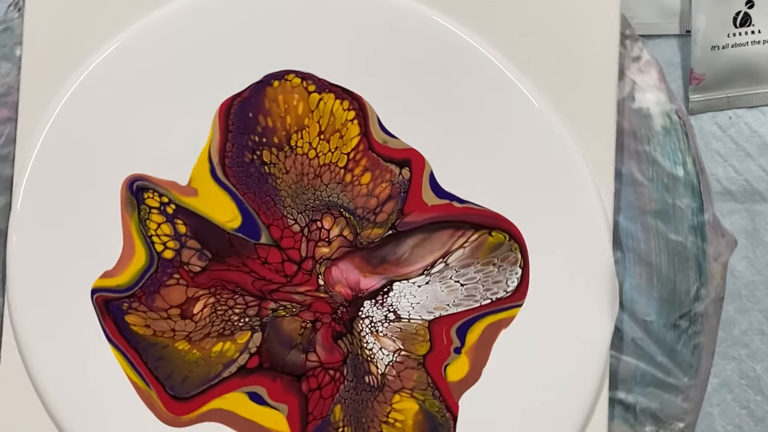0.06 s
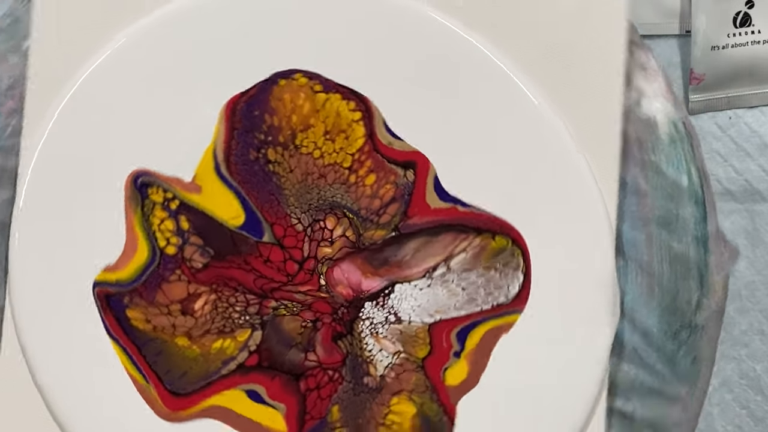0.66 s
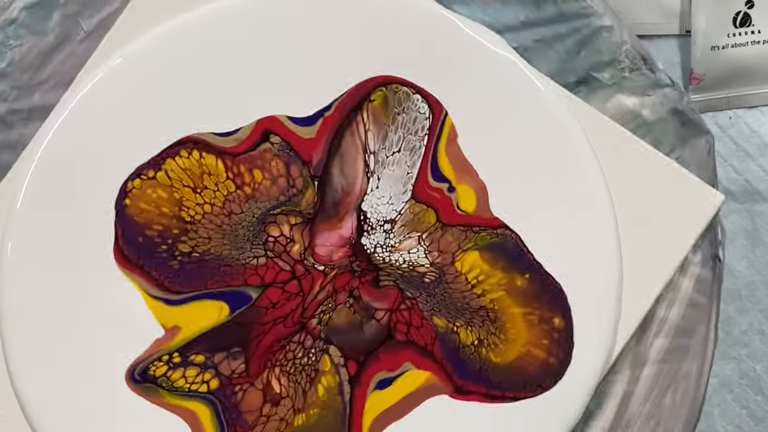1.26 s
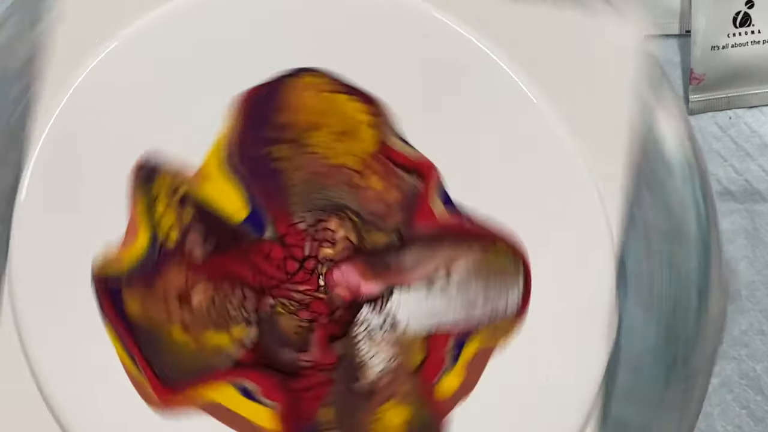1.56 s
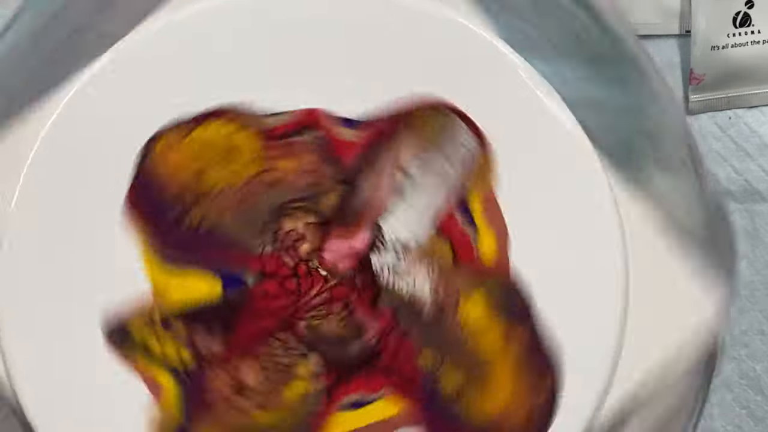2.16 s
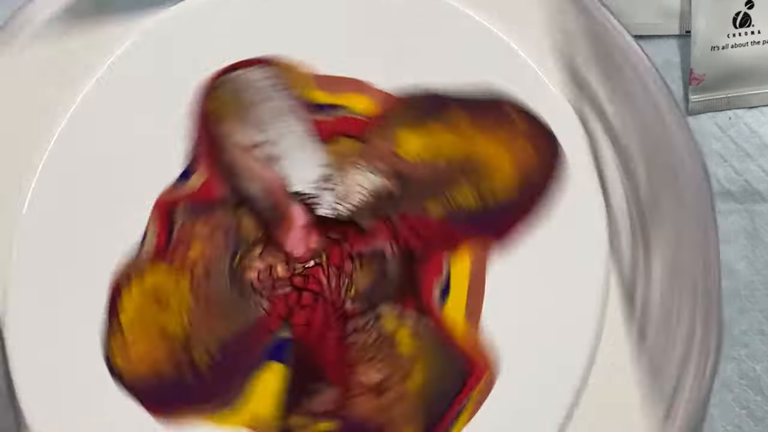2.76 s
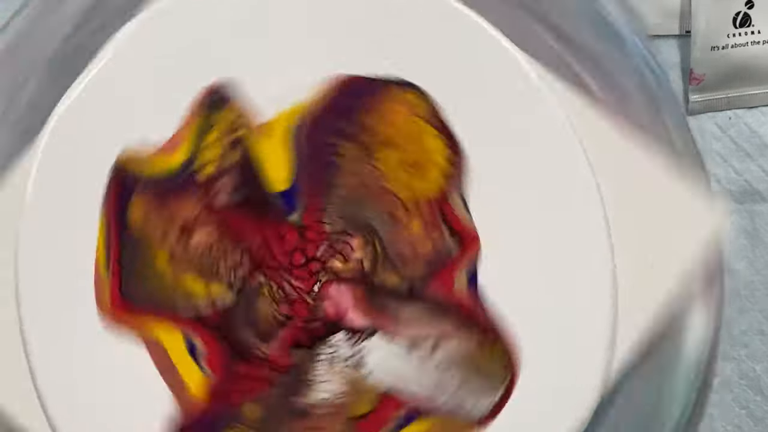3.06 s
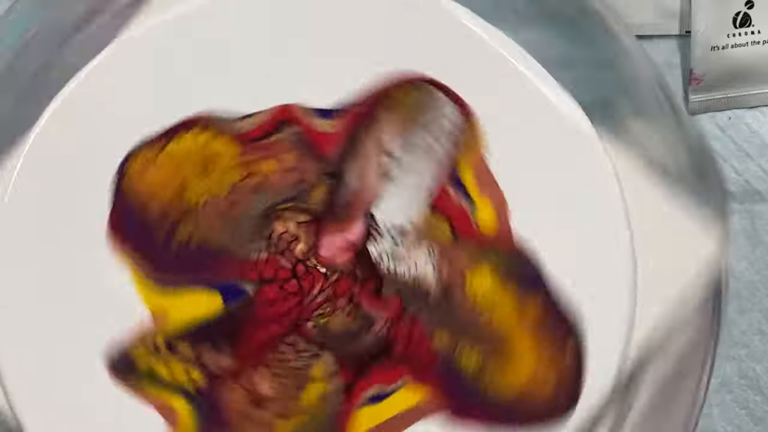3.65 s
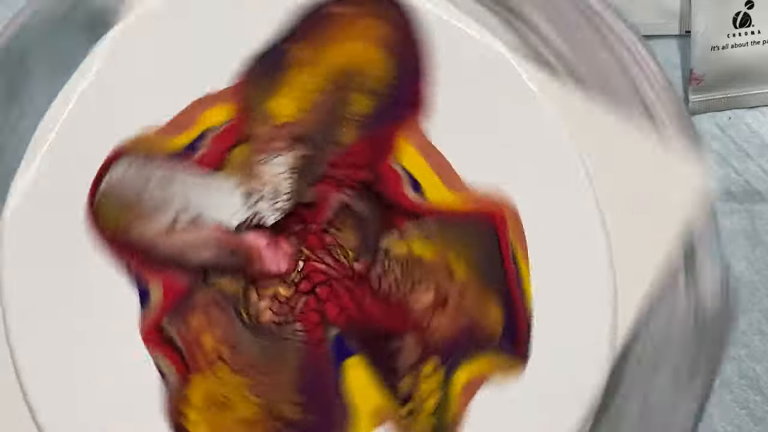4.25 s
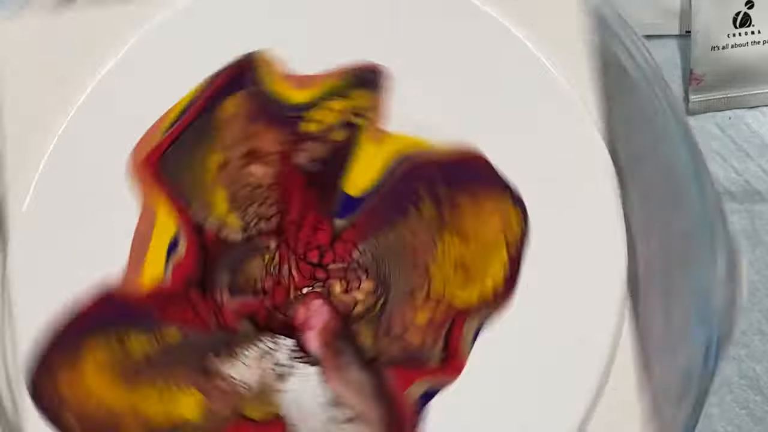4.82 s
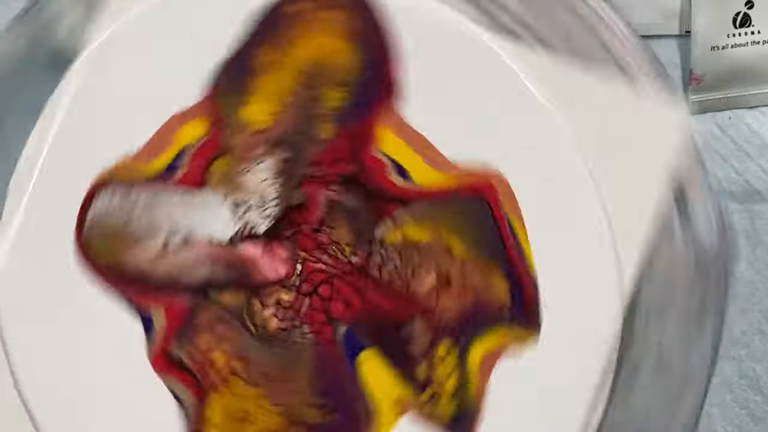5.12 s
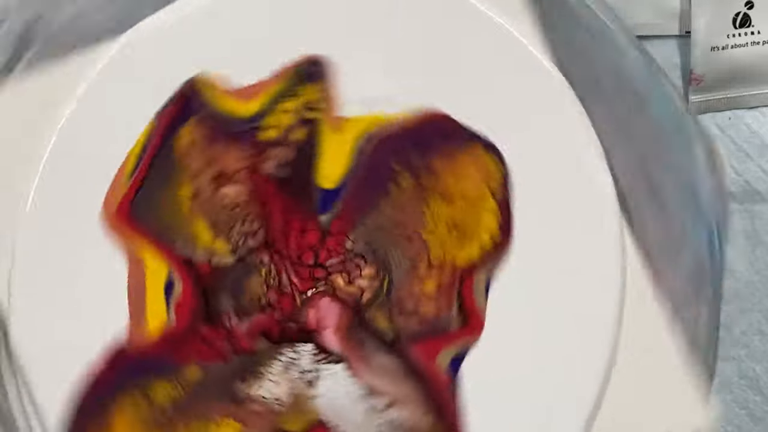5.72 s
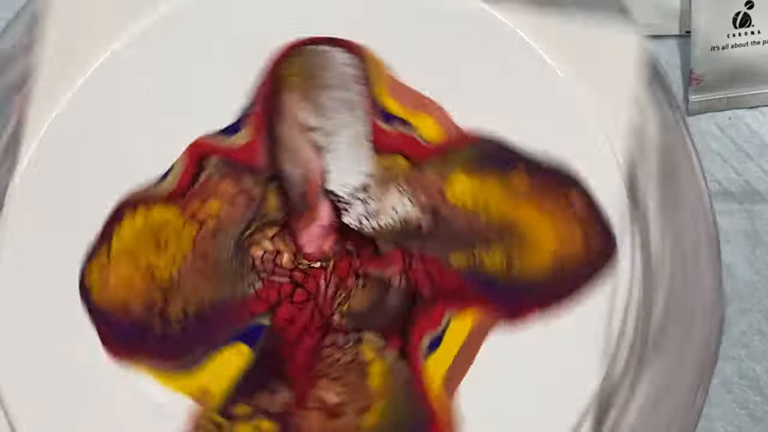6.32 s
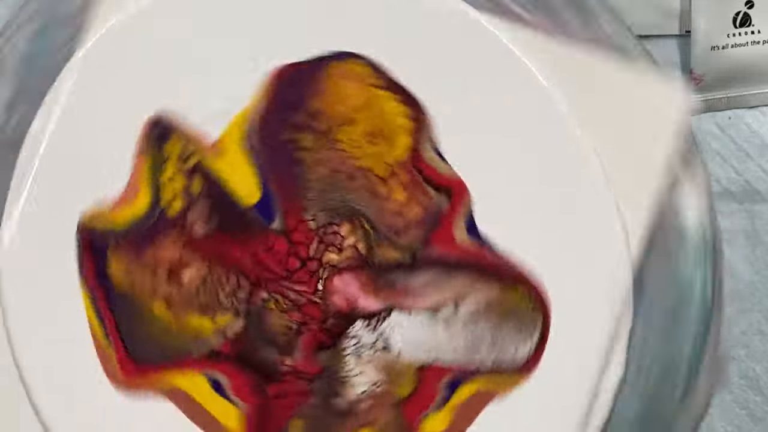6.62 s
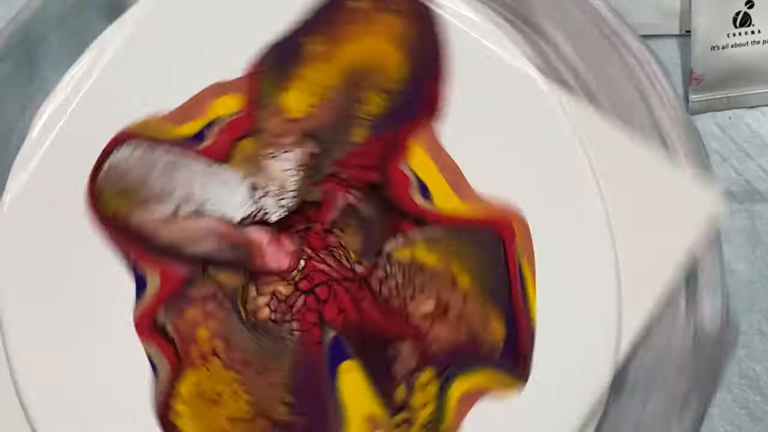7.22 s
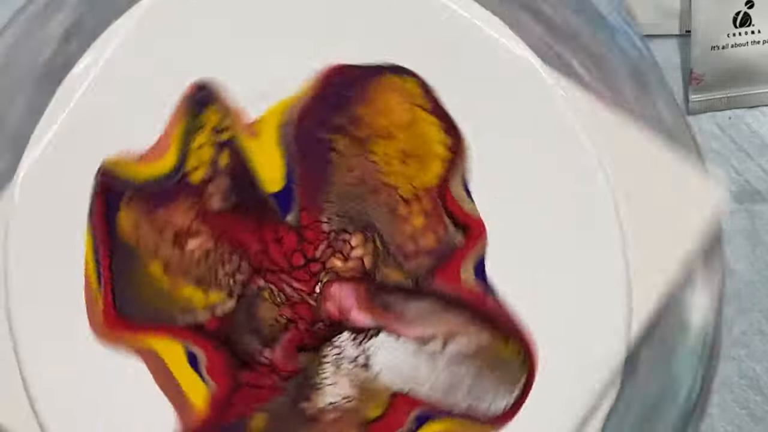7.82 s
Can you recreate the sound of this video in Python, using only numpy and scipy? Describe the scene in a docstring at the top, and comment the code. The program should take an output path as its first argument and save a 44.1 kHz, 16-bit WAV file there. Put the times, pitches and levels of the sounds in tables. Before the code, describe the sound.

A board on a small turntable is nudged with a faint rumble, then flung into a spin. The ball bearing rumbles and whirrs close to the microphone, surging once a turn, with dull knocks, a light hiss and gritty ticks, and slowly eases off. In the second half, further away in the quiet room, thin plastic is handled: a few swishes, a sharp snap and some hollow clacks.

```python
"""A board on a small turntable is nudged, flung into a spin and slowly loses speed, heard close up. The
bearing's balls bump along their race and ring the platter: a boom, a body and a whirr that grow with speed and
surge twice a turn. The rough race hisses and grit in it ticks. Further off in the quiet room something of thin
plastic is handled: a few swishes, a snap and some hollow clacks."""
import sys
import numpy as np
from scipy import signal
from scipy.fft import rfft, irfft, next_fast_len
from scipy.io import wavfile
from scipy.ndimage import uniform_filter1d, map_coordinates

SR = 44100
rng = np.random.default_rng(int(sys.argv[2]) if len(sys.argv) > 2 else 0)


def store_pcm(level_fs):
    """Save levels as 16-bit WAV."""
    pcm = np.round(np.clip(level_fs, -1, 1) * 32767).astype(np.int16)
    wavfile.write(sys.argv[1], SR, np.atleast_2d(pcm).T)


N = 347508
T = np.arange(N) / SR
SIZE = 2 * next_fast_len(N // 2 + SR // 2)  # FFT length, with room for tails
HZ = np.arange(SIZE // 2 + 1) * SR / SIZE
FLING_S = 1.263  # the hand starts to fling the board

# broad response of platter and board to a bump: (frequency [Hz], level [dB])
PLATTER_SHAPE = [(60, -43), (130, -19), (210, -8.5), (350, -11), (497, 2.2), (710, -6), (900, -2.8),
                 (1120, -5), (1370, -10.5), (1530, -20.5), (1900, -29.5), (2600, -63.5)]
# platter resonances: (frequency [Hz], width [Hz], boost [dB])
PLATTER_MODES = [(249.5, 34, 6), (306.3, 44, 13.5), (388.7, 31, 5.5), (496, 120, 5), (572.6, 20, 5),
                 (658, 60, 5), (767.5, 45, 6), (841.5, 41, 7.5), (879, 30, 3.5), (940, 25, 4),
                 (1031, 37, 4), (1150, 26, 1.5), (1260, 78, 4.5), (1335, 37, 7), (1425, 14, 7),
                 (1640, 31, 4.5), (1722, 51, 9)]
# tone colour of grit in the race: (frequency [Hz], level [dB])
GRIT_SHAPE = [(1200, -12.5), (2000, 5), (2800, 7.5), (4700, 2), (6000, -7), (8000, -19.5), (15500, -35)]
# slight ring of the race: (frequency [Hz], width [Hz], boost [dB])
RACE_MODES = [(2390, 200, 3.5), (2630, 140, 3.5), (4830, 230, 2.5), (6800, 300, -1)]


def bearing():
    """Balls bump over the race: the faster the platter turns, the denser, louder and brighter."""
    # swells in the body of the rumble: (middle [s], length [s], added gain [dB])
    swells = [(3.06, 0.2, -3.5), (3.5, 0.42, -1.5), (3.9, 0.47, -12.5), (4.36, 0.35, -5.5), (5.22, .3, -11),
              (6.17, 0.28, -13), (6.73, 0.42, -8), (7.2, .9, -5)]
    speed, angle = spin()
    boom_gain, body_gain, whirr_gain = rolling_gains(speed, angle)
    pace = speed / speed.max()
    knocks = bumps(900 + 2200 * pace, scatter_db=2.5)
    rumble = wander(ring(knocks, PLATTER_SHAPE, PLATTER_MODES))
    boom, rest = split(rumble, hz=337)
    body, whirr = split(rest, hz=606)
    load = undb(1.3 * walk(36)) * (1 + strokes(swells))  # the weight shifts from ball to ball
    waver = undb(walk(10))
    core, edge = split(unit(whirr), hz=1300)
    bottom, core = split(core, hz=735)
    whirr = bottom * pace ** 1.6 + core + edge * pace ** 1.2  # thins to its core at low speed
    platter = unit(boom) * waver * boom_gain + unit(body) * load * body_gain + whirr * whirr_gain
    return platter + whirr_gain * race_hiss(knocks, pace)


def spin():
    """Speed [turns/s] and angle [turns since the fling ended]: a nudge, a fling, then coasting."""
    nudge_s, nudge_length_s, nudge_turns_per_s = 0.46, 0.77, 0.59
    fling_length_s, fling_turns_per_s, drag_per_s = 0.43, 1.41, 0.07
    nudge = nudge_turns_per_s * np.sin(np.pi * np.clip((T - nudge_s) / nudge_length_s, 0, 1))
    # the push weakens as the board runs away from the hand
    push = 1 - np.clip(1 - (T - FLING_S) / fling_length_s, 0, 1) ** 1.56
    coasting_s = np.maximum(T - FLING_S - fling_length_s, 0)
    speed = nudge + fling_turns_per_s * push * np.exp(-drag_per_s * coasting_s)
    return speed, (np.cumsum(speed) - speed[coasting_s == 0].sum()) / SR


def rolling_gains(speed, angle):
    """Boom, body and whirr grow with speed, the boom levelling off first; rough spots make surges."""
    # rough stretches of the race: (place [turns], width [turns], boom [dB], body [dB], whirr [dB])
    rough_spots = [(.1, 0.48, 0.56, 2.5, 0.54), (.4, 0.098, -2.5, 2.5, 1.34)]
    # each for boom, body, whirr
    base_db, knee_turns_per_s, tilts_db = (-28, -24.5, -20.8), (0.91, 1.75, 1.7), (-2.5, -2.5, 1.1)
    surges_db = 0
    for place, width, *band_db in rough_spots:
        distance = (angle - place + .5) % 1 - .5
        surges_db = surges_db + np.outer(band_db, np.exp(-(distance / width) ** 2))
    unsettled = (T > FLING_S) * np.exp(-((T - FLING_S) / 0.88) ** 2)  # brighter until the board settles
    gains = []
    for db, knee, surge_db, tilt_db in zip(base_db, knee_turns_per_s, surges_db, tilts_db):
        drive = (speed / knee) ** 2.9
        grown = drive / np.hypot(1, drive)
        gains.append(undb(db + surge_db + tilt_db * unsettled) * grown / grown.max())
    return gains


def wander(x):
    """The shifting load lets the platter's resonances drift slightly in pitch."""
    detune = 0.0069 * walk(7)
    lead = np.cumsum(detune - uniform_filter1d(detune, SR // 2))
    return map_coordinates(x, [np.arange(N) + lead], order=3, mode="mirror")


def race_hiss(knocks, pace):
    """Fine roughness of the race hisses, with more sizzle at speed; stray grit rattles softly over it."""
    # tone colour of the hiss: (frequency [Hz], level [dB])
    hiss_shape = [(900, -20.5), (1700, 0.5), (2050, 0), (2550, 1.5), (3200, -3.5), (4800, -8),
                  (7000, -13.5), (8500, -21.5), (11000, -34.5), (15500, -37.5)]
    roughness = unit(bumps(2500 + 6000 * pace, scatter_db=4.0) + 0.24 * knocks)
    hiss = ring(roughness, hiss_shape, RACE_MODES) * undb(walk(35))
    hiss, sizzle = split(hiss, hz=8500)
    hiss = hiss + sizzle * pace ** 2.2
    grit = bumps(70, scatter_db=0.0)
    rattle = ring(0.28 * grit + echoes(grit, t60=0.035), GRIT_SHAPE, RACE_MODES)
    return undb(-24) * hiss + undb(-30) * rattle


def lumps():
    """Balls drop heavily over a flaw in the race and ring the platter."""
    # ball drops: (time [s], level [dB])
    drops = [(0.646, -33.5), (0.828, -29), (0.917, -32.5), (1.761, -15), (1.835, -7.5), (1.932, -12.5),
             (2.299, -9), (2.685, -14), (2.803, -8), (3.041, -14), (3.073, -11), (3.229, -11.5),
             (3.304, -12), (3.426, -14), (3.513, -13.5), (3.555, -12.5), (5.265, -13), (6.105, -15),
             (7.703, -19)]
    blows = sum(undb(db) * burst(s, t60=0.024, tail_db=-19, tail_t60=0.12) for s, db in drops)
    low, high = split(ring(blows, PLATTER_SHAPE, PLATTER_MODES), hz=600)
    return low + undb(-1.5) * high


def squeaks():
    """A ball skids just after the fling: tiny whistles that sag in pitch."""
    # skids: (time [s], pitch [Hz], level [dB])
    skids = [(1.8695, 3080, -30), (1.877, 2760, -31)]
    half_length_s, sag_per_s = 0.0015, 14
    out = 0
    for s, hz, db in skids:
        age = T - s
        envelope = undb(db) * np.exp(-(age / half_length_s) ** 2)
        out = out + envelope * np.sin(2 * np.pi * hz * age * (1 - sag_per_s * age / 2))
    return out


def ticks_and_rubs():
    """Grit caught under a ball, a few thin clicks, the hand on the rim and a scrape in the bearing."""
    # light ticks of grit: (time [s], relative level [dB])
    grit_ticks = [(1.6023, -31), (1.609, -34), (1.625, -30), (1.835, -30.5), (1.963, -32), (2.0583, -31),
                  (2.4886, -29), (2.5567, -32), (2.6564, -32), (2.7707, -34), (3.0418, -32), (3.076, -30),
                  (3.7803, -37), (4.1495, -40), (4.2, -37), (4.275, -34.5), (4.4007, -34), (4.513, -39),
                  (4.835, -34), (6.4093, -41), (6.689, -33.5)]
    # thin, high clicks: (time [s], relative level [dB])
    thin_clicks = [(0.892, -45), (1.5943, -28.5), (2.489, -38), (2.554, -47)]
    # bright tone colour of the clicks and the hand: (frequency [Hz], level [dB])
    click_shape = [(2500, -20), (6000, 1.5), (9000, -2.5), (12000, 1), (15500, -2)]
    # a hand brushes the rim: (middle [s], length [s], level [dB])
    brushes = [(.755, 0.17, -61), (1.51, 0.24, -57.5), (2.49, 0.49, -63)]
    # the bearing scrapes under the last of the push: (middle [s], length [s], level [dB])
    scrapes = [(1.615, 0.082, -44)]
    ticks = sum(undb(db - 5.5) * burst(s, t60=0.02, tail_db=-17, tail_t60=0.16) for s, db in grit_ticks)
    clicks = sum(undb(db - 5.5) * burst(s, t60=0.0066, tail_db=-20, tail_t60=0.14)
                 for s, db in thin_clicks)
    brush = strokes(brushes) * rng.standard_normal(N)
    scrape = strokes(scrapes) * bumps(1500, scatter_db=5.0)
    return ring(ticks + scrape, GRIT_SHAPE, RACE_MODES) + ring(clicks + brush, click_shape)


def plastic_swishes():
    """Thin plastic slides: dense slips blur into a swish, with small crinkles as it flexes."""
    # sliding strokes: (middle [s], length [s], level [dB])
    slides = [(5.255, 0.25, -43), (5.47, 0.16, -56), (5.752, 0.17, -48), (5.953, 0.29, -36),
              (6.19, 0.34, -43.5), (6.72, 0.48, -66), (7.2, 0.6, -61), (7.57, 0.62, -62.5)]
    # crinkles: (time [s], relative level [dB])
    flexes = [(5.424, -54), (5.737, -48), (5.752, -48), (5.829, -40), (6.086, -44)]
    # tone colour of sliding plastic: (frequency [Hz], level [dB])
    slide_shape = [(900, -27), (2000, 1.5), (3500, 2), (5500, 2), (8500, -3.5), (10500, -4), (12500, -7.5),
                   (15500, -11)]
    slips = bumps(9000, scatter_db=2.5) * strokes(slides) * undb(walk(40))
    crinkles = sum(undb(db) * burst(s, t60=0.02, tail_db=0, tail_t60=0.17) for s, db in flexes)
    return ring(slips + undb(-7) * crinkles, slide_shape)


def plastic_snap():
    """A tight cluster of cracks rings the plastic sheet and the room."""
    # cracks of the snap: (time [s], relative level [dB], treble [dB])
    cracks = [(5.476, -38, -12), (5.521, -32, -4), (5.53, -19.5, -3), (5.535, -24, -8), (5.541, -21, -13),
              (5.553, -29.5, -7)]
    # broad response of the sheet: (frequency [Hz], level [dB])
    sheet_shape = [(500, -10), (1000, 4), (1600, -2), (2400, -1.5), (3100, -3.5), (4000, -2.5), (6000, -4),
                   (7500, -6.5), (12000, -9.5), (14500, -13), (15500, -18)]
    # sheet resonances: (frequency [Hz], width [Hz], boost [dB])
    sheet_modes = [(1910, 50, 6), (2220, 90, 5), (3570, 70, 6), (4110, 60, 4), (4750, 120, 4),
                   (5310, 180, 10), (6505, 70, 2.5), (8550, 250, 5), (10800, 100, 6), (12150, 300, 5),
                   (13000, 120, 5), (14350, 250, 6)]
    return undb(0.5) * ring(hits(cracks, t60=0.019, tail_t60=0.22), sheet_shape, sheet_modes)


def plastic_clacks():
    """Clacks and taps ring the plastic hollowly."""
    # clacks and taps: (time [s], relative level [dB], treble [dB])
    taps = [(6.184, -28, 1.5), (6.196, -26, -4), (6.2005, -33.5, -2), (6.457, -35, -6), (6.471, -34, -15),
            (6.585, -41, -17), (6.65, -37.5, -17), (6.762, -41, -9)]
    # tone colour of a clack: (frequency [Hz], level [dB])
    clack_shape = [(300, -10), (1000, 1.5), (1400, -2), (1900, -3.5), (2400, -2.5), (2800, -4.5),
                   (3300, -10), (4300, -9.5), (6500, -11.5), (8000, -16), (12000, -19.5), (15500, -26)]
    # its hollow ring: (frequency [Hz], width [Hz], boost [dB])
    hollow_modes = [(2410, 170, 8), (4950, 300, 7), (6200, 200, 6)]
    return undb(-2.0) * ring(hits(taps, t60=0.039, tail_t60=0.33), clack_shape, hollow_modes)


def room_tone():
    """Low, gently wavering rush of the room with faint hums in it."""
    # tone colour of the rush: (frequency [Hz], level [dB])
    rush_shape = [(20, -33), (50, -4), (85, -3.5), (150, -3), (300, -15), (550, -15), (1000, -22),
                  (1900, -27), (2600, -28.5), (4200, -34.5), (6000, -47.5), (7500, -55), (15500, -61.5)]
    # narrow hums: (frequency [Hz], width [Hz], boost [dB])
    hums = [(82, 11, 3.5), (107, 13, 2), (590, 14, 9), (1550, 63, 6.5), (2135, 55, 7), (2370, 30, 5),
            (2573, 130, 10), (2760, 44, 4), (3210, 98, 8), (3400, 30, 6), (4000, 55, 9), (4260, 28, 10),
            (4860, 75, 3.5), (5200, 50, 9.5), (5790, 46, 6), (6400, 120, 6.5)]
    return undb(-42 + 0.68 * walk(4.8)) * ring(rng.standard_normal(N), rush_shape, hums)


def room_spread(x, t60):
    """Room reflections reach left and right differently and widen the sound."""
    # reflected sound in the side signal: (frequency [Hz], level [dB])
    side_shape = [(50, -16.5), (170, -21), (300, -19.5), (450, -14.5), (630, -12), (800, -17.5),
                  (1350, -20.5), (1550, -7), (2000, -8.5), (2600, -15.5), (3300, -18.5), (3700, -30),
                  (4500, -28), (5000, -12.5), (11000, -12.5), (12300, -20), (14000, -13.5)]
    room = rfft(echoes(signal.unit_impulse(N), t60), SIZE)
    room = room / np.sqrt(uniform_filter1d(np.abs(room) ** 2, size=400))  # even across the spectrum
    side = irfft(rfft(x, SIZE) * room * undb(curve_db(side_shape)))[:N]
    return np.array([x + side, x - side])


def undb(db):
    """Decibels to gain."""
    return 10 ** (np.asarray(db) / 20)


def unit(x):
    """Scale to rms 1."""
    return x / np.sqrt(np.mean(x ** 2))


def curve_db(shape):
    """An EQ curve through (Hz, dB) points, joined along log frequency."""
    hz, db = np.transpose(shape)
    return np.interp(np.log(HZ + 1), np.log(hz), db)


def ring(x, shape, modes=()):
    """Causal filter of unit power gain: a broad shape with resonances standing on it."""
    db = curve_db(shape)
    for centre, width, height in modes:
        db = db + height / (1 + (2 * (HZ - centre) / width) ** 2)
    cepstrum = irfft(np.log(unit(undb(db))))
    cepstrum[1:SIZE // 2] *= 2  # fold to minimum phase, so the ring follows the hit
    cepstrum[SIZE // 2 + 1:] = 0
    return irfft(rfft(x, SIZE) * np.exp(rfft(cepstrum)))[:N]


def split(x, hz):
    """The parts below and above a frequency."""
    low = signal.sosfiltfilt(signal.butter(4, hz, fs=SR, output="sos"), x)
    return low, x - low


def walk(rate):
    """A smooth random drift of rms 1 that takes `rate` steps a second."""
    hold = int(SR / rate)
    steps = np.repeat(rng.standard_normal(N // hold + 1), hold)
    return unit(uniform_filter1d(uniform_filter1d(steps, hold), hold)[:N])


def bumps(rate, scatter_db):
    """Random impacts, about `rate` a second, of scattered size and either sign."""
    hit = rng.random(N) < rate / SR
    size = undb(scatter_db * np.clip(rng.standard_normal(N), -2, 2))
    return unit(hit * size * rng.choice([-1, 1], N) / np.sqrt(rate))


def strokes(rows):
    """Gain of strokes that swell and fade alike, 19.5 dB down at either end of their length."""
    return sum(undb(db - 19.5 * np.abs(2 * (T - s) / length) ** 1.9) for s, length, db in rows)


def burst(s, t60, tail_db, tail_t60):
    """A short crack of noise and its tail in the room."""
    fall = np.maximum(T - s, 0) * np.log(1000)
    envelope = np.exp(-fall / t60) + undb(tail_db) * np.exp(-fall / tail_t60)
    return (T >= s) * envelope * rng.standard_normal(N)


def hits(rows, t60, tail_t60, tail_db=-4.5):
    """Sharp cracks with their near and far echo, each as bright as its row says."""
    out = 0
    for s, db, treble_db in rows:
        crack = burst(s, t60, tail_db, tail_t60)
        far_echo = undb(-14.5) * burst(s, t60=0.41, tail_db=tail_db, tail_t60=tail_t60)
        low, high = split(crack + far_echo, hz=4000)
        out = out + undb(db) * (low + undb(treble_db) * high)
    return out


def echoes(x, t60):
    """A diffuse tail of reflections that sets in after 3 ms."""
    age = T[:SR // 3]
    tail = rng.standard_normal(len(age)) * np.exp(-np.log(1000) * age / t60) * (age > .003)
    return signal.fftconvolve(x, tail / np.linalg.norm(tail))[:N]


def scene():
    """The turntable and the handled plastic over the room tone."""
    turntable = bearing() + lumps() + squeaks() + ticks_and_rubs()
    plastic = plastic_swishes() + plastic_snap() + plastic_clacks()
    return room_spread(turntable + plastic + room_tone(), t60=0.1)


def record(dry):
    """A phone's two channels part in phase and level; the top is cut at 15.1 kHz."""
    # left channel against right: (frequency [Hz], phase lead [rad], level [dB])
    channel_offsets = [(150, 0, .6), (300, -.13, 0), (850, -.07, -.8), (1450, 0, -.5), (1900, .45, 1),
                       (2200, .4, 1), (2500, 0, 1.5), (3500, 0, 0), (4600, 0, 0), (5500, -.9, 0),
                       (6900, -.4, 0), (7250, 1.6, 0), (8100, 2.3, 0), (8400, 3.1, 0), (9400, 3.15, 0),
                       (9700, 3.6, 0), (10300, 4.3, 0), (11700, 6.2, 0), (13000, 6.4, 0), (14500, 9.1, 0)]
    hz, *columns = np.transpose(channel_offsets)
    lead, left_db = (np.interp(HZ, hz, column) for column in columns)
    left = undb(left_db / 2) * np.exp(.5j * lead)
    channels = irfft(rfft(dry, SIZE) * np.array([left, 1 / left]))[:, :N]
    return signal.sosfilt(signal.ellip(8, .2, 70, 15100, fs=SR, output="sos"), channels)


dry = scene()
out = record(dry)
store_pcm(out)
```